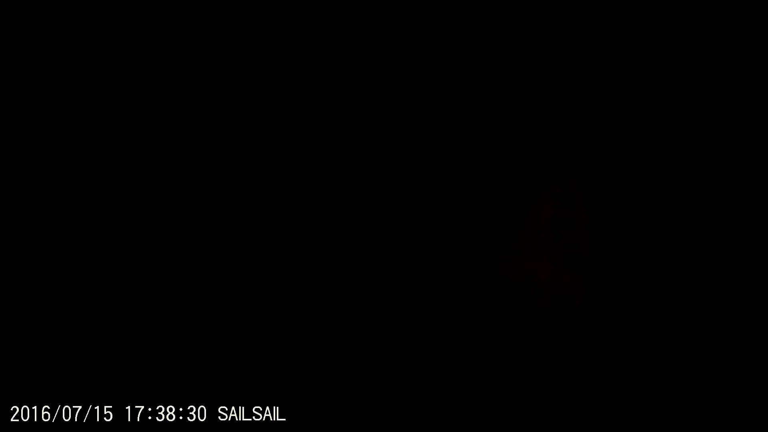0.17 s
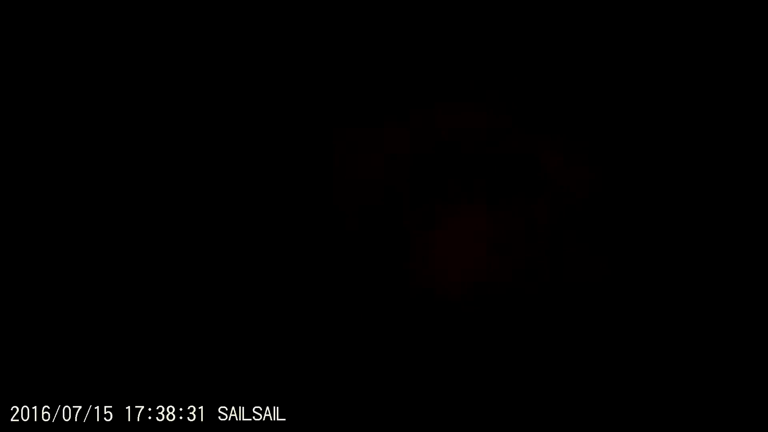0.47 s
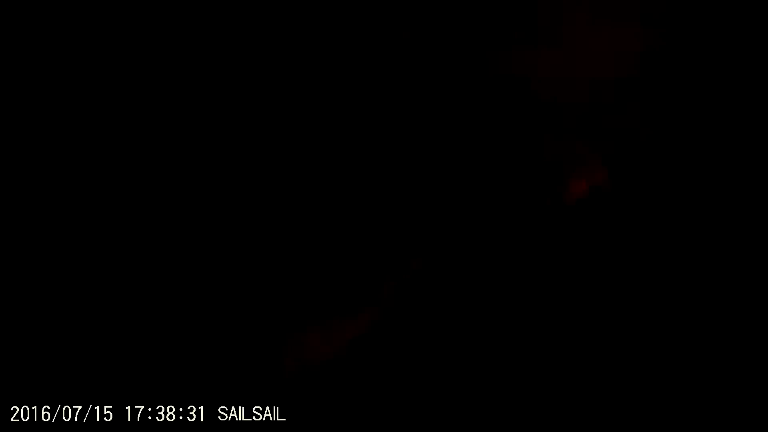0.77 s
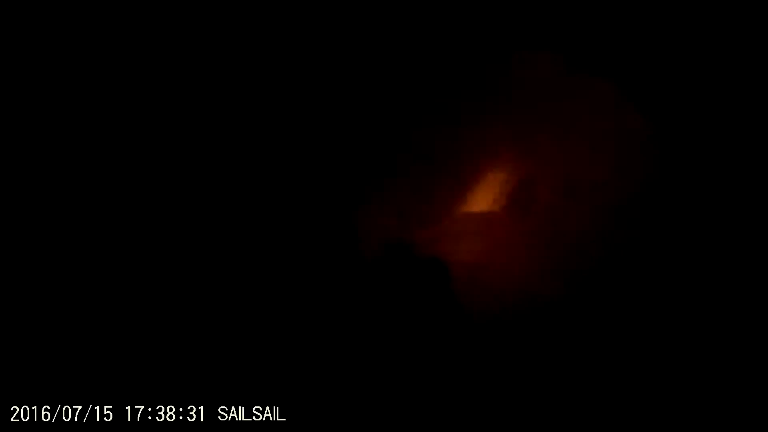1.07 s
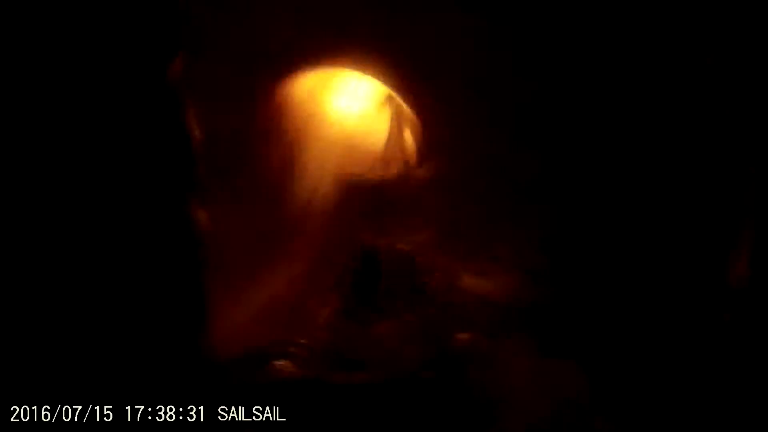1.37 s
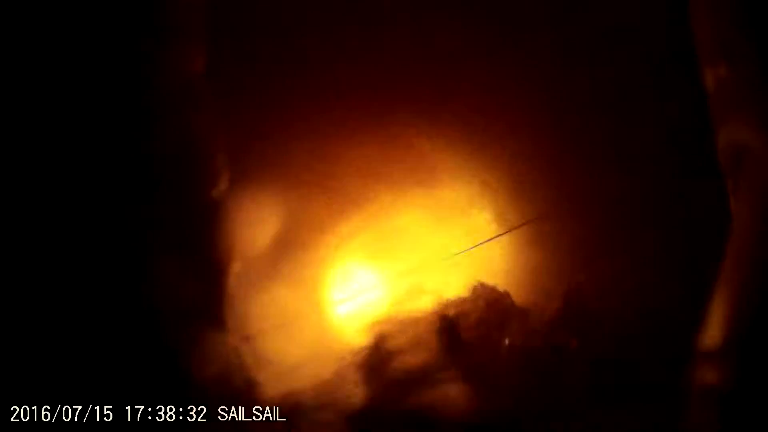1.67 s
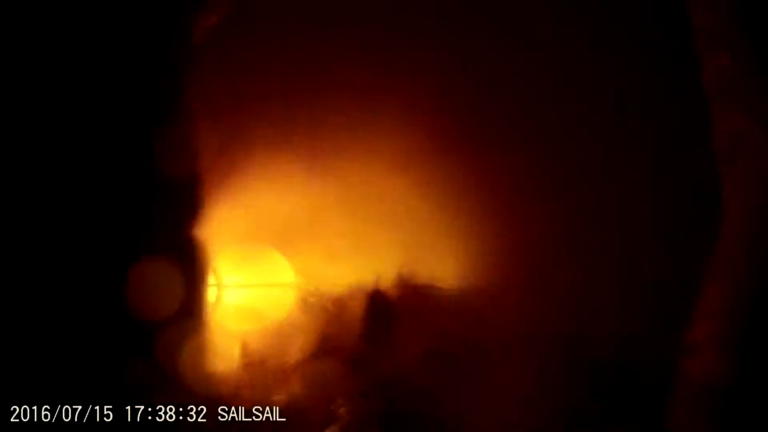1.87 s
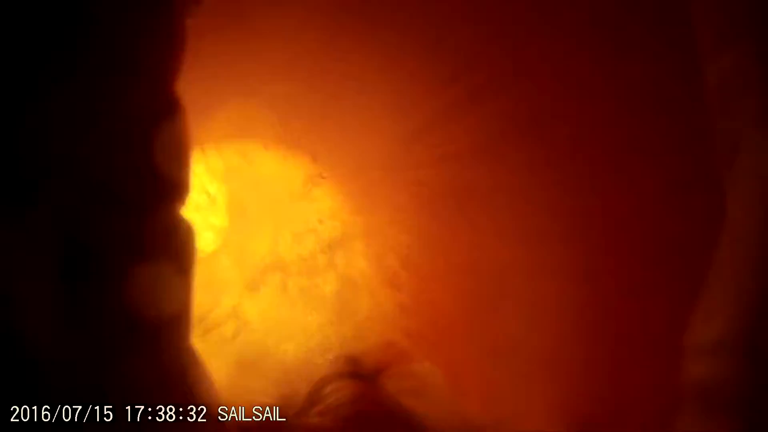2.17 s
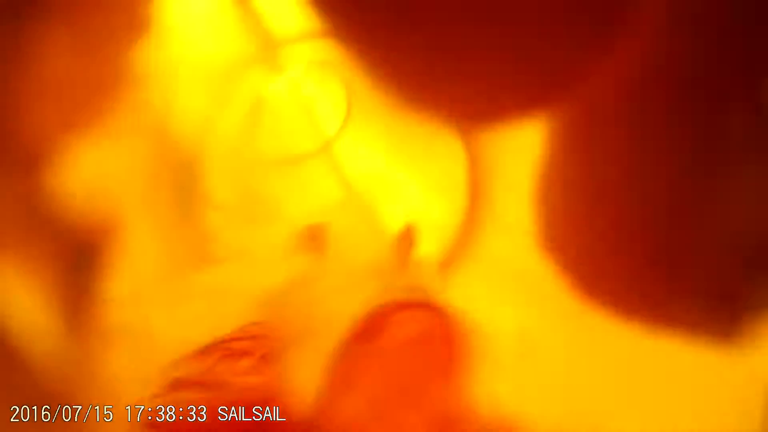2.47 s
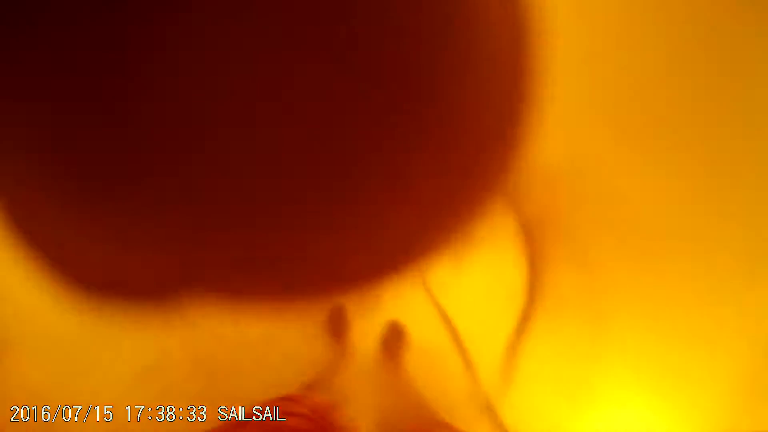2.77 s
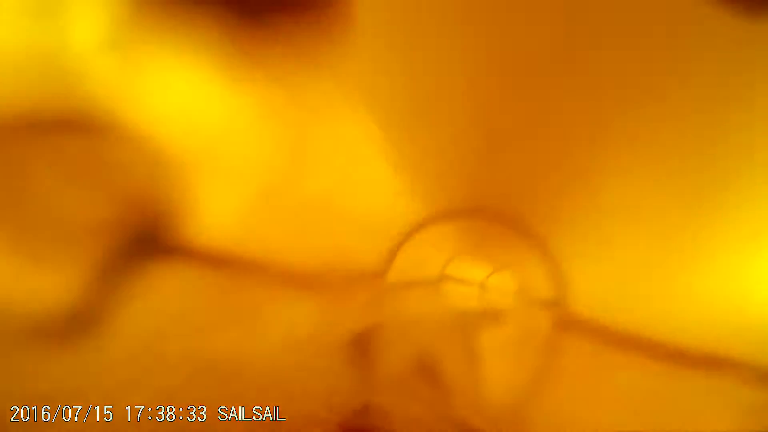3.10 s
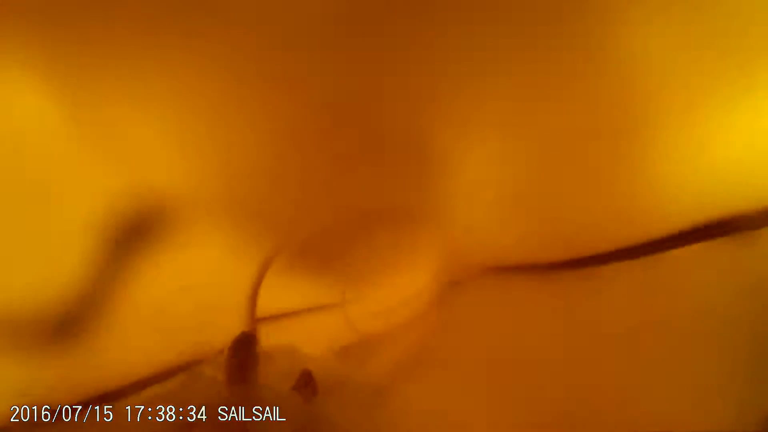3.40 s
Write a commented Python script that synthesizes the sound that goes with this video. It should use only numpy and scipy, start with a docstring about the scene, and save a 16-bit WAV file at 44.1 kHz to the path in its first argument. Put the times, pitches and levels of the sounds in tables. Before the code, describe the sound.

Water rushes from about 0.07 s after silence, a steady, boxy, fizzing hiss over faint rumble, close inside a sealed case. A thump lands near 0.16 s, sharp seam knocks at 0.77 and 1.58 s, with sparse drop ticks. Drops crowd into a splash around 2.3-2.5 s; the rush turns lower and gurgly. A double thump follows at 2.68 s, more drops around 3.15-3.3 s, and the hollow rush runs to about 3.5 s.

```python
"""A ride down an enclosed water slide, heard by a microphone in a sealed case.
After a short silence, filtered hiss and fizz rush through the case's resonances over a lumpy noise rumble
and a faint sine whine; seams knock as decaying rings, bumps thump as pressure pushes, drops tick as short tones.
At about 2.3 s a splash thickens the drops and wets the case: its resonances shift, most of them downward.
Late on, from about 3 s, the rush rings more near 1.2 kHz and less near 2 kHz."""
import sys
import numpy as np
from scipy import signal
from scipy.fft import rfft, irfft
from scipy.io import wavfile
from scipy.ndimage import uniform_filter1d

SR = 44100
rng = np.random.default_rng(int(sys.argv[2]) if len(sys.argv) > 2 else 0)


def wav_record(signal):
    """Record a signal, one row per channel, as 16-bit PCM in the file named by sys.argv[1]."""
    frames = np.transpose(np.atleast_2d(signal))
    bounded = np.clip(frames, -1, 1)
    # unit amplitude maps onto the largest positive 16-bit level
    quanta = np.round(bounded * 32767).astype(np.int16)
    wavfile.write(sys.argv[1], SR, quanta)


N = 156114

# Course of the ride's steady layers: (time [s], rush level [dB], treble spray level [dB], rumble level [dB]).
# The spray is shifted to the rush's typical level and the rumble is trimmed where they are used.
FLOW_COURSE = [(0.12, -37.0, -52, -55), (0.22, -36, -50, -51), (0.35, -38.5, -53.5, -52.5),
               (0.5, -39.5, -51.5, -47.5), (0.58, -36, -52, -45), (0.68, -34, -48.5, -54.5),
               (0.8, -36.5, -50, -50), (1.05, -38.5, -53, -50), (1.35, -38.5, -54, -51),
               (1.5, -35, -49.5, -58), (1.65, -36, -51, -46), (1.8, -38, -51, -53), (1.95, -36, -51, -49),
               (2.07, -38.5, -50.5, -59), (2.16, -37, -49, -52), (2.34, -37.5, -47.5, -53),
               (2.42, -34.5, -49.5, -36), (2.5, -40, -49.5, -42), (2.72, -38.0, -50, -38.5),
               (2.82, -37.5, -51.5, -44), (2.92, -35, -50, -49), (3.02, -36, -48, -49),
               (3.12, -34.5, -47, -48), (3.18, -36.5, -46, -43), (3.27, -36.5, -48, -49),
               (3.38, -36.5, -49, -50.5), (3.48, -36, -48, -53)]

WET_FROM_S, WET_BY_S = 2.33, 2.53
SKIRT_DRY, SKIRT_WET = 1.49, 1.24  # steepness of the resonance flanks

SWELL_DB, SWELL_PER_S = 0.74, 18  # all bands of the rush together
FLICKER_DB, FLICKER_PER_S = 1.0, 30  # each band alone
GURGLE_DB = 1.5  # extra flicker of the lower bands once the case is wet
FIZZ_PER_S, FIZZ_DB = 1500, -10.5  # level against the hiss
FIZZ_SPREAD_DB, FIZZ_MOST = 4.5, 4.4  # mean lift of a fizz grain, and its cap in spreads
SETTLE_FROM_S, SETTLE_BY_S = 3.05, 3.3
HOLLOW_DB, DULL_DB = 3.5, -4.5  # late change of the rush near 1.2 kHz and near 2 kHz

DROP_T60_S, DROP_T60_SLOPE = 0.0071, 0.092  # at 1 kHz; higher drops die a little sooner
DROP_RISE_S, DROP_HISS_S, DROP_HISS_DB = 0.00036, 0.0014, -6
PUFF_RMS = 0.2  # of a 0 dB hiss puff or treble tick
PATTER_DB, PATTER_S, PATTER_TREBLE_DB = -21.5, 0.00052, 6
PATTER_SPREAD_DB, PATTER_MOST = 4.5, 2.2  # mean lift of a small drop, and its cap in spreads

KNOCK_RISE_S, CRACK_RISE_S = 0.00058, 0.0004
BUMP_POINT = 1.25  # 1 pointed, 2 round
RUMBLE_LUMPS_DB, LUMPS_PER_S, RUMBLE_TRIM_DB = 2.0, 30, -1.5
WHINE_HZ, WHINE_DB = 13608, -82
START_S, LOW_CUT_HZ, TOP_HZ = 0.072, 20.3, 15900


def amp(db):
    """dB to gain."""
    return 10 ** (np.asarray(db, float) / 20)


def unit(x):
    """Scale to rms 1."""
    return x / np.sqrt(np.mean(x ** 2))


def curve(table, axis):
    """A column of a timed table, interpolated to one value per sample."""
    points = np.array(table)
    return np.interp(np.arange(N) / SR, points[:, 0], points[:, axis])


def walk(rate):
    """Random levels held 1 / rate s, smoothed into slews and scaled to spread 1."""
    hold = int(SR / rate)
    steps = np.repeat(rng.standard_normal(N // hold + 1), hold)
    smooth = uniform_filter1d(uniform_filter1d(steps, hold), hold)
    return unit(smooth[:N])


def slope(points, hz):
    """dB of (Hz, dB) points, interpolated on a log frequency axis."""
    points = np.array(points)
    return np.interp(np.log(hz + 1), np.log(points[:, 0]), points[:, 1])


def causal(x, power):
    """Filter by the minimum-phase response of a power spectrum, folding its cepstrum to positive time."""
    cepstrum = irfft(np.log(power) / 2)
    half = len(cepstrum) // 2
    cepstrum[1:half] *= 2
    cepstrum[half + 1:] = 0
    response = irfft(np.exp(rfft(cepstrum)))[:2048]
    return signal.fftconvolve(x, response)[:N]


def add(out, start_s, x):
    """Mix x into out from start_s on."""
    i = int(start_s * SR)
    out[i:i + len(x)] += x[:N - i]


def band_limit(order, hz, kind, x):
    """Butterworth filter."""
    return signal.sosfilt(signal.butter(order, hz, kind, fs=SR, output="sos"), x)


def decaying_ring(hz, t60, t):
    """A sine, first swing downward, that falls 60 dB in t60 s."""
    return -np.sin(2 * np.pi * hz * t) * np.exp(-np.log(1000) * t / t60)


def wetness():
    """0 with the case dry, rising to 1 as the splash wets it."""
    return np.clip((np.arange(N) / SR - WET_FROM_S) / (WET_BY_S - WET_FROM_S), 0, 1)


def case(x):
    """Sound through the wall's resonances, crossfaded dry to wet at rms 1; also gives the dry rms."""
    # Case resonances: (dry centre [Hz], dry width [Hz], dry level [dB],
    # wet centre [Hz], wet width [Hz], wet level [dB])
    modes = np.array([(518, 70, -10, 484, 22, -10.5), (1110, 253, -5.5, 920, 220, -16),
                      (1383, 224, -2.5, 1145, 115, -0.5), (1997, 450, -3, 1960, 143, 0.5),
                      (2346, 150, -6.5, 1360, 270, -5.5), (3245, 260, -10.5, 3320, 130, -12.5),
                      (3970, 600, -10, 4080, 380, -14), (5620, 810, -18, 5760, 410, -25),
                      (7400, 1700, -25, 7720, 480, -28), (10600, 1850, -29, 10540, 1000, -33),
                      (12000, 890, -37.5, 11700, 1000, -35.5), (14380, 1400, -78, 14200, 1500, -66)])
    # What leaks through between the resonances: (frequency [Hz], level [dB])
    leak = [(30, -30), (300, -24.5), (700, -17.5), (2800, -15.5), (5000, -28), (9000, -39), (16000, -70)]
    hz = np.linspace(0, SR / 2, 4097)

    def through(rows, skirt):
        peaks = sum(amp(2 * db) / (1 + (2 * (hz - f) / width) ** 2) ** skirt for f, width, db in rows)
        return causal(x, amp(2 * slope(leak, hz)) + peaks)  # doubled dB: power

    dry_sound = through(modes[:, :3], SKIRT_DRY)
    wet_sound = through(modes[:, 3:], SKIRT_WET)
    share = wetness()
    return unit(dry_sound) * (1 - share) + unit(wet_sound) * share, np.std(dry_sound)


def water():
    """Turbulent hiss and fizz: quarter-octave bands swell together and flicker alone; spray sets the treble."""
    grains = (rng.random(N) < FIZZ_PER_S / SR) * rng.standard_normal(N)
    fizz = grains * amp(FIZZ_SPREAD_DB * np.minimum(rng.exponential(size=N), FIZZ_MOST))
    swell = amp(SWELL_DB * walk(SWELL_PER_S))
    raw = rfft((rng.standard_normal(N) + amp(FIZZ_DB) * unit(fizz)) * swell)
    octave = np.log2(np.arange(len(raw)) * SR / N / 250 + 1e-9)  # above 250 Hz
    octave = np.clip(octave, 0, 6.5)  # the end bands take in all beyond them

    rush, spray = curve(FLOW_COURSE, axis=1), curve(FLOW_COURSE, axis=2)
    spray = spray - np.median(spray - rush)  # keep its movement at the level of the rush
    settle = np.interp(np.arange(N) / SR, [SETTLE_FROM_S, SETTLE_BY_S], [0, 1])
    wet = wetness()
    out = 0
    for k in np.arange(0, 6.6, .25):
        band = np.clip(1 - 4 * np.abs(octave - k), 0, 1)  # overlapping triangles
        # Spray takes over from 3 to 6 kHz and yields partly at the very top
        high = np.clip(k - 3.6, 0, 1) * np.clip(6.6 - k, .3, 1)
        flicker_db = FLICKER_DB + GURGLE_DB * wet * (1 - high)
        db = (1 - high) * rush + high * spray + flicker_db * walk(FLICKER_PER_S)
        db = db + settle * (HOLLOW_DB * (k == 2.25) + DULL_DB * (2.75 <= k <= 3.25))
        out = out + irfft(raw * band, N) * amp(db)
    return case(out)[0] * np.std(out)


def drop(hz, treble_db, chance):
    """A drop's strike: a few fading cycles, a puff of broad mid hiss from a third of the pitch up, a treble tick."""
    t = np.arange(len(chance)) / SR
    rise = 1 - np.exp(-t / DROP_RISE_S)
    fade = np.exp(-t / DROP_HISS_S) * rise
    decay = np.exp(-np.log(1000) * t / DROP_T60_S * (hz / 1000) ** DROP_T60_SLOPE)
    tone = 2 * rise * np.sin(2 * np.pi * hz * t) * decay
    puff = band_limit(3, [hz / 3, max(4600, 0.97 * hz)], "bandpass", chance * fade)
    tick = band_limit(4, [7200, 11500], "bandpass", chance[::-1] * fade)
    puff = amp(DROP_HISS_DB) * PUFF_RMS * puff / puff.std()
    return tone + puff + amp(treble_db) * PUFF_RMS * tick / tick.std()


def loud_drops():
    """Single drops striking the case, each with its own pitch and treble."""
    # Drops: (time [s], nominal peak [dB], pitch [Hz], treble tick level [dB over the drop])
    strikes = [(.211, -29, 5700, -6), (0.275, -33.5, 5100, -8), (.339, -25, 1480, -19),
               (0.612, -26, 1980, -14), (1.394, -30, 1370, -20), (1.9762, -20.5, 1820, -24),
               (2.1043, -30.5, 2120, -2), (2.129, -44, 2250, -11), (2.141, -21, 2280, -8),
               (2.151, -28, 1950, -6), (2.178, -28, 5400, -18), (2.192, -25, 2170, -12),
               (2.251, -34, 2040, -17), (2.257, -24, 1490, -24), (2.266, -25, 915, -26),
               (2.27, -27, 1980, -24), (2.284, -25, 980, -14), (2.291, -22, 1400, -26),
               (2.3017, -14.5, 1060, -32), (2.314, -16.5, 1770, -27), (2.319, -28, 1720, -26),
               (2.3526, -16.5, 1260, -20), (2.361, -19, 990, -27), (2.382, -17, 2140, -30),
               (2.385, -19, 1970, -30), (2.392, -20.5, 1900, -11), (2.4099, -19.5, 1770, -29),
               (2.416, -18, 1850, -29), (2.4314, -17, 1140, -24), (2.4536, -9.5, 3530, -17.5),
               (2.49, -26, 1140, -24), (2.512, -25.5, 3170, -18), (2.527, -19.5, 1140, -30),
               (2.604, -25.5, 1070, -14.5), (2.637, -28.5, 3870, -33), (2.822, -26, 1260, -44),
               (2.863, -25.5, 3470, -40), (3.052, -29, 1300, -11), (3.149, -18.5, 1200, -41),
               (3.174, -19.5, 1990, -30), (3.201, -22, 1970, -16), (3.2901, -18, 1900, -51),
               (3.402, -30.5, 4130, -38), (3.427, -26, 1200, -30)]
    out = np.zeros(N)
    for (start_s, db, hz, treble_db), chance in zip(strikes, rng.standard_normal((len(strikes), 600))):
        add(out, start_s, amp(db) * drop(hz, treble_db, chance))
    return out


def patter():
    """Random decaying noise ticks, full-band and treble-only, that thicken in the splash and ring the case."""
    # Density of the patter: (time [s], small drops in each of the two streams [per s])
    density = [(0, 8), (2.05, 8), (2.12, 120), (2.22, 200), (2.28, 900), (2.43, 900), (2.6, 40), (3.0, 15),
               (3.15, 250), (3.25, 20), (3.54, 20)]
    struck = rng.random((2, N)) < curve(density, axis=1) / SR
    hits = struck * amp(PATTER_SPREAD_DB * np.minimum(rng.exponential(size=(2, N)), PATTER_MOST))
    tails = signal.lfilter([1], [1, -np.exp(-1 / (PATTER_S * SR))], hits)
    full, thin = tails * rng.standard_normal((2, N))
    thin = band_limit(4, 6500, "highpass", thin)
    rung, size = case(full + amp(PATTER_TREBLE_DB) * thin)
    return amp(PATTER_DB) * rung * size


def knocks():
    """Seams knock the case: a short low ring with the crack of its wall, a sum of higher rings, on top."""
    # Seams: (time [s], nominal peak [dB], ring [Hz], ring t60 [s], crack level [dB over the knock],
    # direction [only the sign counts])
    seams = [(.5669, -23.5, 480, 0.014, 2, -1), (0.7668, -11, 370, 0.012, -5, 1),
             (1.224, -28.5, 424, 0.012, 2.5, 1), (1.5768, -12.5, 390, 0.0088, -11.5, 1),
             (1.8608, -24.5, 360, 0.007, -32, 1), (2.3012, -17.5, 494, 0.0074, -24, -8.5),
             (2.416, -20, 300, 0.0053, -26, 1), (2.4317, -24, 430, 0.0053, 5, -1),
             (3.2908, -28, 288, 0.0071, -2, 1)]
    # Modes of the case wall: (frequency [Hz], level [dB], t60 [s])
    wall_modes = [(727, 5, 0.0051), (1200, 0, 0.0058), (1980, -1, 0.0066), (2800, 0, 0.0031),
                  (3800, -8, 0.0038)]
    out, t = np.zeros(N), np.arange(3000) / SR
    # The gains 2 and 1.7 make up for level lost in the soft rise and the decay
    crack = 2 * (1 - np.exp(-t / CRACK_RISE_S))
    crack = crack * sum(amp(db) * decaying_ring(hz, t60, t) for hz, db, t60 in wall_modes)
    rise = 1.7 * (1 - np.exp(-t / KNOCK_RISE_S))
    for start_s, db, hz, t60, crack_db, way in seams:
        knock = rise * decaying_ring(hz, t60, t) + amp(crack_db) * crack
        add(out, start_s, np.sign(way) * amp(db) * knock)
    return out


def bumps():
    """Bumps thump the case: smooth pressure pushes, some followed by opposite rebounds."""
    # Pushes and rebounds: (time of the peak [s], peak [dB], width at 1/e of the peak [s], direction [sign])
    pushes = [(0.127, -31, 0.0034, -1), (0.1636, -15, 0.0013, 1), (0.175, -18, 0.0094, -1),
              (0.245, -33, .03, -1), (0.299, -33.5, 0.0051, -1), (0.9906, -26, 0.0022, 1),
              (1.122, -38.5, 0.0073, 1), (1.391, -31.5, 0.0024, -1), (1.814, -35, 0.0073, 1),
              (1.8577, -26.5, 0.0033, 1), (2.393, -34, 0.0082, -1), (2.534, -34, 0.015, 1),
              (2.672, -16.5, 0.0023, -1), (2.674, -28, 0.014, 1), (2.6838, -13.5, 0.0039, -1),
              (2.687, -17.5, 0.0045, 1), (2.714, -29, 0.0077, -1), (2.838, -29.5, 0.013, 1),
              (3.049, -30.5, 0.0033, 1), (3.181, -37, 0.011, 1), (3.453, -33.5, 0.011, -1)]
    out = np.zeros(N)
    for peak_s, db, length, way in pushes:
        reach = 1.5 * length
        u = np.arange(-reach * SR, reach * SR) / (length * SR)
        push = np.exp(-np.abs(2 * u) ** BUMP_POINT)
        add(out, peak_s - reach, np.sign(way) * amp(db) * push)
    return out


def rumble():
    """Low rumble of the ride: noise with wandering level, filtered to a falling spectrum."""
    # Rumble spectrum: (frequency [Hz], relative level per Hz [dB])
    spectrum = [(15, 7.5), (30, 3.5), (60, -4), (120, -7), (250, -9), (500, -28.5), (1000, -49)]
    hz = np.linspace(0, SR / 2, 4097)
    lumpy = rng.standard_normal(N) * amp(RUMBLE_LUMPS_DB * walk(LUMPS_PER_S))
    low = causal(lumpy, amp(2 * slope(spectrum, hz)))
    return unit(low) * amp(curve(FLOW_COURSE, axis=3) + RUMBLE_TRIM_DB)


def whine():
    """A faint steady sine high in the treble."""
    return amp(WHINE_DB) * np.sin(2 * np.pi * WHINE_HZ * np.arange(N) / SR)


def scene():
    """Everything reaches one microphone inside the case, sent to both channels."""
    mono = water() + loud_drops() + patter() + knocks() + bumps() + rumble() + whine()
    return np.array([mono, mono])


def record(dry):
    """Low cut, silent lead-in, then a steep elliptic roll-off of the top."""
    x = band_limit(1, LOW_CUT_HZ, "highpass", dry)
    x = x * (np.arange(N) >= START_S * SR)
    return signal.sosfilt(signal.ellip(10, .2, 60, TOP_HZ, fs=SR, output="sos"), x)


dry = scene()
out = record(dry)
wav_record(out)
```